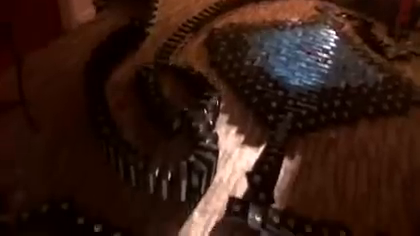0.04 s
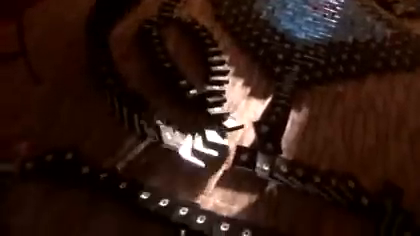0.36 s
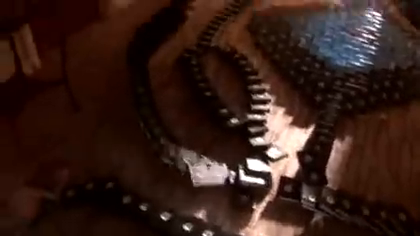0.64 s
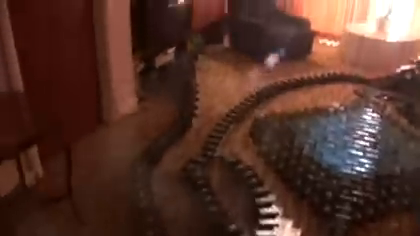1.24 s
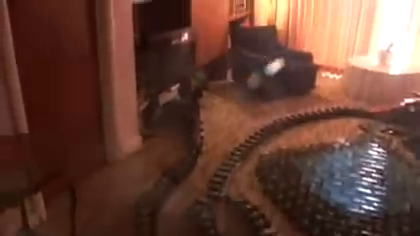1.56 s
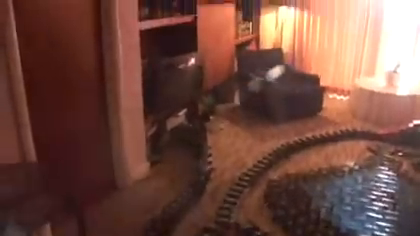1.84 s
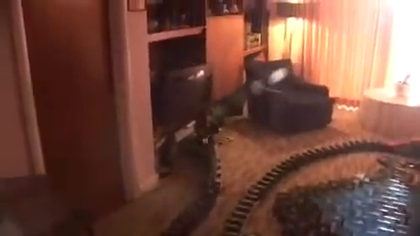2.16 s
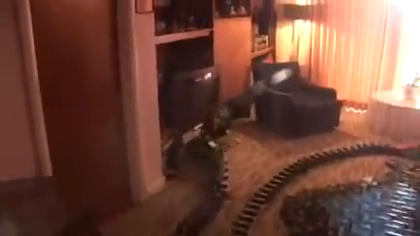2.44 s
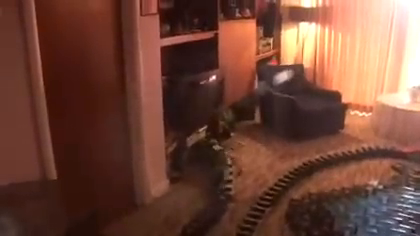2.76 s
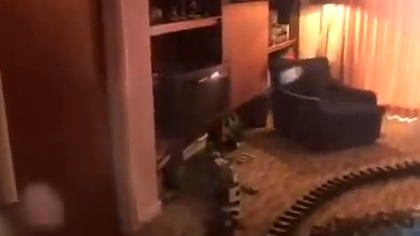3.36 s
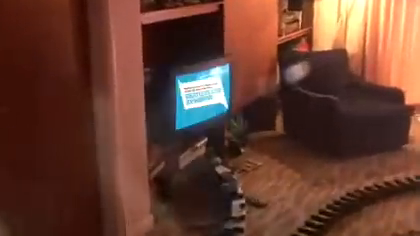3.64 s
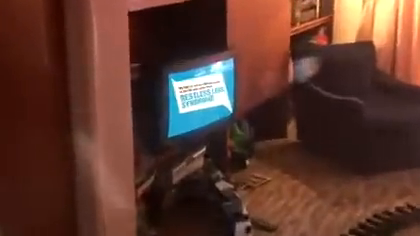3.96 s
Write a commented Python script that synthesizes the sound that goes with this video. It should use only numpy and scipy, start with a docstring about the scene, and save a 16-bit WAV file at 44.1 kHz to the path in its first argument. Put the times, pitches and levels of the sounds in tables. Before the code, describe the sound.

A chain of dominoes falls with rapid clattering on a floor indoors. After a brief lull, scattered clacks, sliding ticks and soft thuds follow and die away, over a low rumble and faint hiss.

```python
"""A dense clatter of dominoes toppling on a living-room floor lasts a second and a half, then runs on in single
clacks that thin out and fade. Each is a dying burst of tiny contacts; some carry a short pitched note. Brief
thin fizzes flicker above 10 kHz at a few moments. In between, fallen tiles slide and tick. Low resonances of
the floor sound as dull thuds. Reverberation gives the clatter a short tail, and a low rumble with faint hiss
lies underneath."""
import sys
import numpy as np
from scipy import signal
from scipy.fft import rfft, irfft
from scipy.io import wavfile
from scipy.ndimage import uniform_filter1d

SR = 44100
rng = np.random.default_rng(int(sys.argv[2]) if len(sys.argv) > 2 else 0)


def persist_wave(psi):
    """Save psi, clipped to +-1, as 16-bit WAV."""
    counts = np.round(np.clip(psi, -1, 1) * 32767).astype(np.int16)
    wavfile.write(sys.argv[1], SR, np.atleast_2d(counts).T)


N = 4 * SR
IMPACT_RISE_S = 0.0004


def amp(db):
    """Decibels express an amplitude ratio on a logarithmic scale."""
    return 10 ** (np.asarray(db) / 20)


def unit(x):
    """Normalisation brings the rms to one."""
    return x / np.sqrt(np.mean(x ** 2) + 1e-20)


def curve_at(points, hz):
    """Interpolation reads a curve along a logarithmic frequency axis."""
    point_hz, value = np.transpose(points)
    return np.interp(np.log(hz + 1), np.log(point_hz + 1), value)


def add(mix, start_s, sound):
    """Superposition: a sound adds to the mix from its start time."""
    part = mix[max(round(start_s * SR), 0):][:len(sound)]
    part += sound[:len(part)]


def freqs(size):
    """Fourier analysis gives evenly spaced bins, here in Hz."""
    return np.fft.rfftfreq(size, 1 / SR)


def minimum_phase(db):
    """Causality: the response with these gains that rings only after the blow."""
    log_gain = np.log(amp(db))
    mirrored = np.r_[log_gain, log_gain[-2:0:-1]]
    return np.exp(np.conj(signal.hilbert(mirrored)))[:len(db)]


# Each row: frequency in Hz, relative spectral density of the background in dB.
BACKGROUND_SPECTRUM = [(10, -5.5), (25, -6), (47, -13), (70, -10), (110, -17), (320, -29), (1000, -39),
                       (3200, -63.5), (7500, -65), (9500, -68.5), (10200, -95)]
def background(mid_db=-42.5, side_db=-3.5, side_cutoff_hz=45.3):
    """Coloured noise: rumble and faint hiss, with left and right differing mainly in the deep bass."""
    hz = freqs(N)
    mid, side = rfft(rng.standard_normal((2, N))) * amp(curve_at(BACKGROUND_SPECTRUM, hz))
    side = amp(side_db) * unit(irfft(side / np.sqrt(1 + (hz / side_cutoff_hz) ** 2)))
    return amp(mid_db) * (unit(irfft(mid)) + np.array([side, -side]))


# Each row: frequency in Hz, reverberation time (a fall of 60 dB) in seconds.
ROOM_DECAY = [(120, 0.75), (400, 0.32), (1200, 0.31), (3000, 0.25), (9300, 0.16), (10200, 0.065)]
def room_tail(first_echo_s=0.0029, build_s=0.0048, clump_db=2):
    """Reverberation: echoes from one spot on the floor arrive in clumps, and the treble dies first."""
    clumps = unit(uniform_filter1d(rng.standard_normal(SR // 2), SR // 600))
    echoes = rng.standard_normal(len(clumps)) * amp(clump_db * np.clip(clumps, -2, 2))
    hz, t, spectra = signal.stft(echoes, SR, nperseg=256)
    decay = amp(-60 * t / curve_at(ROOM_DECAY, hz)[:, None])
    tail = signal.istft(spectra * decay, SR, nperseg=256)[1]
    tail *= np.clip((np.arange(len(tail)) / SR - first_echo_s) / build_s, 0, 1)
    return tail / np.linalg.norm(tail)


# Each row: start in seconds, relative energy in dB, pitch in Hz, the knock's 60 dB decay in seconds.
FLOOR_THUDS = [(1.088, -16, 69.7, 0.24), (1.685, -20.5, 167.3, 0.14), (1.81, -30, 145, 0.25),
               (2.29, -17.5, 196, 0.22), (2.345, -21, 160, 0.25), (2.729, -12, 171, .08),
               (2.888, -18, 205, 0.13), (2.945, -15.5, 100.4, 0.16), (3.099, -16.5, 108, 0.26),
               (3.172, -16, 151.6, 0.27), (3.262, -18, 125, 0.3), (3.408, -25, 305, 0.07),
               (3.412, -17, 142, 0.22), (3.52, -28, 159, 0.17)]
def floor_thuds(rise_s=0.003, boom_db=-2, boom_octaves=0.66, boom_t60_s=0.45, size=32768):
    """Damped modes: the floor gives a low knock and a diffuse boom of neighbouring resonances."""
    out, t, hz = np.zeros(N), np.arange(size) / SR, freqs(size) + 1
    rise = 1 - np.exp(-t / rise_s)
    energy_scale = np.sqrt(SR / 1000 / size)  # 0 dB is the energy of 1 ms at unit rms
    for start_s, energy_db, pitch_hz, t60_s in FLOOR_THUDS:
        knock = unit(np.sin(2 * np.pi * pitch_hz * t) * rise * amp(-60 * t / t60_s))
        band = np.exp(-(np.log2(hz / pitch_hz) / boom_octaves) ** 2)
        resonances = irfft(rfft(rng.standard_normal(size)) * band)
        boom = unit(resonances * rise * amp(-60 * t / boom_t60_s))
        add(out, start_s, amp(energy_db) * energy_scale * unit(knock + amp(boom_db) * boom))
    return out


# Each row: frequency in Hz, relative gain in dB of a tile striking tile and floor.
TILE_SPECTRUM = [(60, -14.5), (150, -8.5), (300, -1.5), (600, 0), (1000, 1), (2000, -0.5), (3200, -3),
                 (4500, -6), (6500, -9.5), (8500, -14), (9500, -20.5), (10000, -41), (12000, -56)]
def tile_colour(hz, bass_db=0, treble_db=0, bass_hz=650, treble_hz=2222):
    """Frequency response of a struck tile in dB, tilted by a bass shelf and a treble shelf."""
    bass = bass_db / (1 + (hz / bass_hz) ** 4)
    treble = treble_db * hz ** 4 / (hz ** 4 + treble_hz ** 4)
    return curve_at(TILE_SPECTRUM, hz) + bass + treble


def contact_strengths(size, spread_db):
    """Exponential statistics in dB: most contacts are weak and a few are strong."""
    return amp(spread_db * np.minimum(rng.exponential(1, size), 4))


# Each row: time in seconds, level of the patter in dB.
PATTER_LEVELS = [(0, -34.5), (1.42, -34.3), (1.52, -50), (1.64, -57), (1.91, -62), (1.98, -53),
                 (2.12, -43.5), (2.4, -44.5), (2.5, -43.5), (2.7, -49), (2.93, -47), (3.05, -58),
                 (3.299, -67.5), (3.6, -68)]
def patter(ticks_per_s=1100, top_hz=9100, reverb_db=-4.5):
    """Shot noise: fallen tiles slide and tick against each other at random instants."""
    impulses = (rng.random(N) < ticks_per_s / SR) * rng.choice([-1., 1.], N)
    impulses *= contact_strengths(N, spread_db=3.4)
    ticks = unit(irfft(rfft(impulses) * minimum_phase(tile_colour(freqs(N)))))
    ticks = signal.sosfilt(signal.butter(10, top_hz, fs=SR, output="sos"), ticks)
    ticks *= amp(np.interp(np.arange(N) / SR, *np.transpose(PATTER_LEVELS)))
    return ticks + amp(reverb_db) * signal.fftconvolve(ticks, room_tail())[:N]


# Each row: start in seconds, level in dB before the rise and decay.
FIZZ_BURSTS = [(0.065, -44), (0.194, -44), (0.734, -40), (1.065, -35), (1.785, -47), (2.034, -46),
               (2.144, -40), (2.9, -45)]
def high_fizz(centre_hz=10600, width_hz=1000, t60_s=0.035, size=4096):
    """Band-limited noise: brief thin fizzes flicker around 10-11 kHz at a few moments."""
    out, t = np.zeros(N), np.arange(size) / SR
    band = np.exp(-((freqs(size) - centre_hz) / width_hz) ** 2)
    envelope = (1 - np.exp(-t / IMPACT_RISE_S)) * amp(-60 * t / t60_s)
    for start_s, level_db in FIZZ_BURSTS:
        fizz = unit(irfft(rfft(rng.standard_normal(size)) * band))
        add(out, start_s, amp(level_db) * fizz * envelope)
    return out


def clack(energy_db, rattle_s, bass_db, treble_db, note_hz=None, note_db=None, size=8192):
    """Impact excitation: a tile lands in a dying rattle; some clacks carry a short pitched note."""
    contacts_per_s, base_note_t60_s, trim_db = 8000, 0.029, -1
    t, hz = np.arange(size) / SR, freqs(size) + 1
    contacts = rng.choice([-1., 1.], size) * (rng.random(size) < contacts_per_s / SR)
    contacts += 0.061 * rng.standard_normal(size)
    contacts *= contact_strengths(size, spread_db=2.5)
    rise = 1 - np.exp(-t / (IMPACT_RISE_S + 0.074 * rattle_s))
    force = contacts * rise * np.exp(-t / (2 * rattle_s))
    colour_db = tile_colour(hz, bass_db, treble_db)
    rattle = irfft(rfft(force) * minimum_phase(colour_db))
    # Power relative to a flat 700-2500 Hz band: a broader spectrum carries more energy.
    breadth = np.sum(amp(colour_db) ** 2) / np.sum((hz > 700) & (hz < 2500))
    note = np.zeros(size)
    if note_hz:
        decay_s = base_note_t60_s / np.log(1000) + rattle_s  # a longer rattle prolongs the note
        note = amp(note_db) * unit(np.sin(2 * np.pi * note_hz * t) * rise * np.exp(-t / decay_s))
    energy_scale = np.sqrt(SR / 1000 / size)
    return amp(trim_db + energy_db) * energy_scale * np.array([np.sqrt(breadth) * unit(rattle), note])


# Each row: start in seconds, relative energy in dB, time constant of the rattle's energy in seconds,
# bass and treble shelves in dB and, for a clack with a note, its pitch in Hz and relative energy in dB.
DOMINO_IMPACTS = [(0.0006, -15, 0.0076, 5.5, 5), (0.0122, -13.5, 0.0054, 0.5, 1),
                  (0.0368, -12.5, 0.0059, 0.5, 3.5, 2750, -4.5), (0.0651, -12, 0.0047, 6.5, 2),
                  (0.0807, -12, 0.0072, -1.5, 5.5), (0.1155, -9, 0.0011, -12, 0),
                  (0.1583, -19, 0.0038, 5, 9), (0.166, -12.5, 0.0078, -6.5, -0.5, 1990, -3),
                  (0.1935, -14.5, 0.0018, -2, 5, 1860, -6), (0.215, -14, 0.0092, 1, 5),
                  (0.2322, -16.5, 0.0035, 9, 5.5), (0.2708, -10, 0.0012, -17, -3, 2780, -7.5),
                  (0.285, -15, 0.015, 1, 3), (0.3048, -14.5, 0.003, 2, 3, 2105, -6),
                  (0.317, -15, 0.013, 3, 4.5), (0.3326, -13, 0.011, 2, 3),
                  (0.3775, -15, 0.003, -4, 3.5, 1926, -5), (0.4295, -13, 0.0016, -2.5, 3.5),
                  (0.452, -9.5, 0.01, -11, 0, 1814, -5.5), (0.472, -13, 0.004, 2, 1.5),
                  (0.48, -18, 0.0012, -5, 5), (0.4855, -20.5, 0.0014, -10, 12.5),
                  (0.499, -21, 0.0022, -20, 5, 2450, -8), (0.518, -18.5, 0.0008, -14, 10),
                  (0.5522, -17.5, 0.0041, 5, 7.5), (0.5884, -12, 0.0032, 2.5, 1.5),
                  (0.6083, -13, 0.0085, -1.5, 1.5, 676, -0.5), (0.6324, -12.5, 0.002, -18, 2.5),
                  (0.6796, -15.5, 0.0011, -2, 5), (0.7326, -9.5, 0.0041, -2, 1, 1200, -4),
                  (0.7734, -12, 0.0045, 0, 1, 603, -3), (0.8128, -12.5, 0.0011, -6, 0.5, 1137, -4),
                  (0.852, -14.5, 0.0044, 5.5, 0, 1110, -8), (0.8992, -13.5, 0.0074, 3.5, 4.5, 618, 0.5),
                  (0.9382, -11.5, 0.0022, -5.5, 0.5, 1916, -6), (0.981, -14, 0.0013, 3, 0.5),
                  (1.0213, -13.5, 0.0022, 5, 0.5, 997, -5.5), (1.0641, -10, 0.0048, 4.5, 1.5, 880, -5),
                  (1.1102, -11, 0.013, 1, 1.5), (1.1488, -13, 0.0045, -5, 5.5, 598, 0.5),
                  (1.1818, -15.5, 0.0033, 5, 6.5, 2520, -6), (1.195, -13.5, 0.023, 0.5, 0.5),
                  (1.2227, -13.5, 0.0064, -1, 3.5), (1.2514, -18, 0.0011, -5, 9.5, 2100, -8),
                  (1.3141, -10.5, 0.0085, -1, 5, 1077, -2), (1.3726, -13.5, 0.0065, 3, 2),
                  (1.3836, -10.5, 0.014, 5, 2.5, 555, -5.5), (1.426, -11, 0.0092, 0, -2.5),
                  (1.4663, -12, 0.0086, -1.5, -3, 1905, -6), (1.5291, -21.5, 0.0023, 5, -7, 754, 1.5),
                  (1.548, -10.5, 0.0044, -6.5, -6.5), (1.6682, -22, 0.0017, -3, -6, 740, -5),
                  (1.6819, -21, 0.012, 6, -2), (1.7852, -17, 0.002, -15, -4),
                  (1.7935, -24.5, 0.006, -12, -7), (1.931, -35, 0.003, 4, -11), (1.9542, -32, 0.002, 7, -4),
                  (1.992, -32, 0.005, 6, -12), (2.0334, -15.5, 0.0011, 0.5, 2, 908, -3),
                  (2.0428, -24, 0.0025, -11, -1, 927, 6), (2.1134, -29, 0.006, 14, -3),
                  (2.1344, -30, 0.01, 3, 9.5, 1910, -2), (2.1441, -14, 0.002, -7, -1.5, 880, -8),
                  (2.2282, -13.5, 0.0027, -4.5, -7.5, 1464, -5.5),
                  (2.2828, -17, 0.0045, -8, -0.5, 1430, -2.5), (2.2929, -17.5, 0.0097, 9.5, 0, 844, -2),
                  (2.3294, -15, 0.0019, -4, 3.5, 887, 0.5), (2.3664, -14.5, 0.0052, 7.5, 1.5, 1220, -4.5),
                  (2.3877, -18, 0.0018, -1, 3, 980, 2.5), (2.406, -23, 0.0015, 0, 2),
                  (2.4728, -24.5, 0.002, 0, -1), (2.5125, -28, 0.002, 0, -2),
                  (2.5322, -9.5, 0.007, -8, -1, 993, 0), (2.5669, -14.5, 0.009, 1, -1),
                  (2.63, -26, 0.016, 12, -1.5, 1865, -2), (2.726, -14, 0.0024, -5, 0.5),
                  (2.759, -27, 0.002, 0, 0), (2.7909, -22.5, 0.0037, 3.5, -1, 2330, -1),
                  (2.8416, -23, 0.0013, 6, 0, 738, 4.5), (2.8891, -18.5, 0.00096, 1, -4.5, 1750, -4),
                  (2.9006, -21.5, 0.00097, -3, 8.5, 1440, 1), (2.9359, -32, 0.0011, 4, 11.5),
                  (2.946, -22, 0.0073, 6.5, -2.5, 612, -4), (3.0809, -41, 0.0015, 24, 9, 880, -5),
                  (3.143, -33.5, 0.0076, 6, -1, 936, 1), (3.1615, -23, 0.0036, 10, -3, 940, 0),
                  (3.215, -35.5, 0.006, -2, -12), (3.2502, -37, 0.0018, -2, -4),
                  (3.4078, -34, 0.0018, 9, -20), (3.4195, -54, 0.0016, 2, 17.5),
                  (3.5303, -50, 0.0015, 17.5, -5)]
def domino_chain(reverb_db=-7.1):
    """Direct and reflected sound: each tile's rattle echoes from its own spot; the note stays dry."""
    out = np.zeros(N)
    for start_s, *impact in DOMINO_IMPACTS:
        rattle, note = clack(*impact)
        add(out, start_s, rattle + note)
        add(out, start_s, amp(reverb_db) * signal.fftconvolve(rattle, room_tail()))
    return out


def scene():
    """Superposition: tiles and floor sound in the centre, over the stereo background."""
    return domino_chain() + high_fizz() + patter() + floor_thuds() + background()


def record(dry):
    """Band limiting: a low-pass filter keeps the sound below 12 kHz."""
    lowpass = signal.firwin(511, 12000, window=("kaiser", 9), fs=SR)
    return signal.oaconvolve(dry, lowpass[None], "same")


dry = scene()
out = record(dry)
persist_wave(out)
```